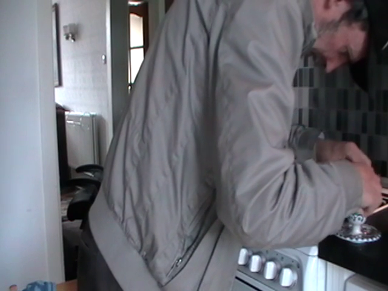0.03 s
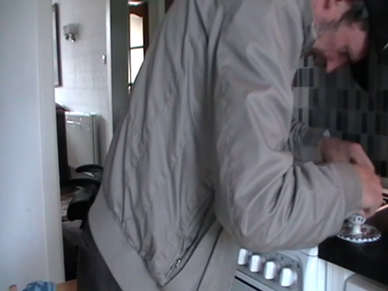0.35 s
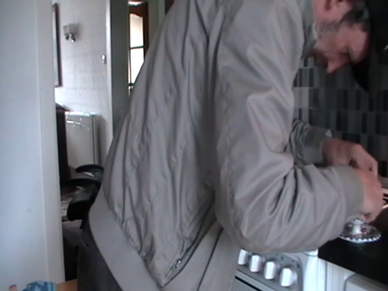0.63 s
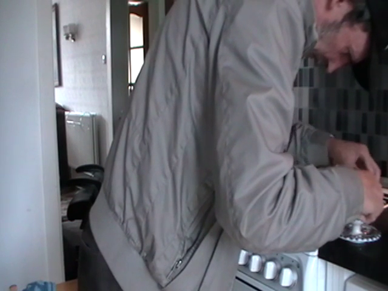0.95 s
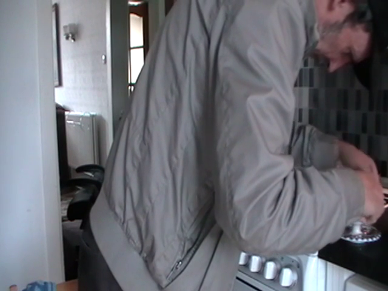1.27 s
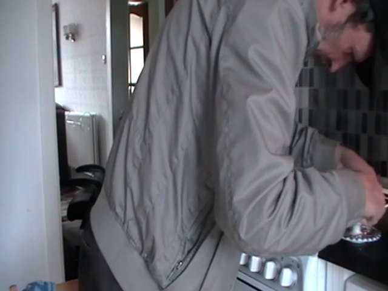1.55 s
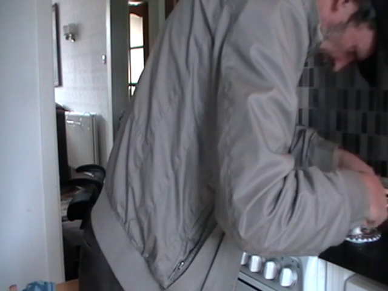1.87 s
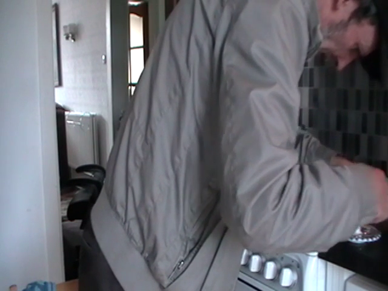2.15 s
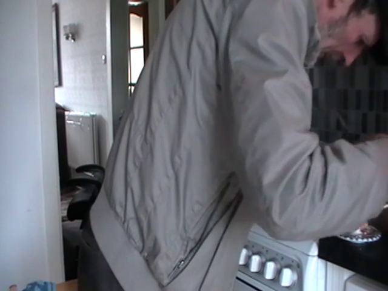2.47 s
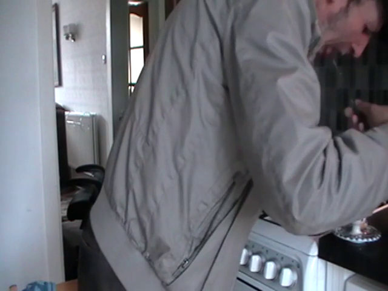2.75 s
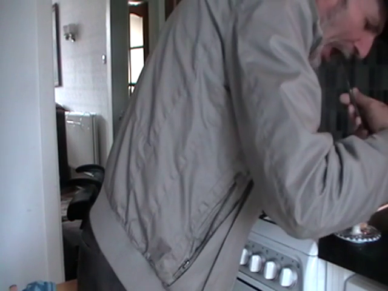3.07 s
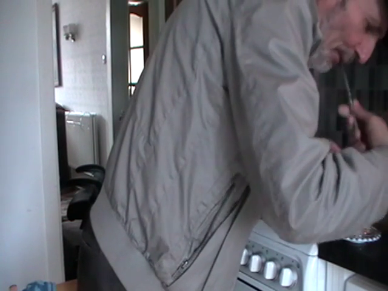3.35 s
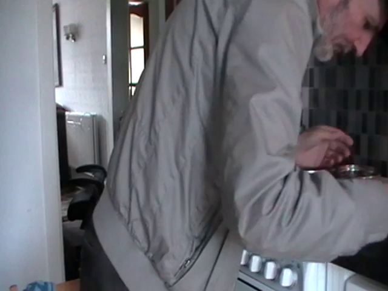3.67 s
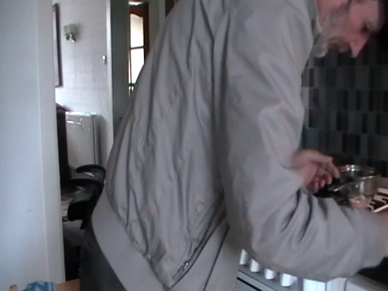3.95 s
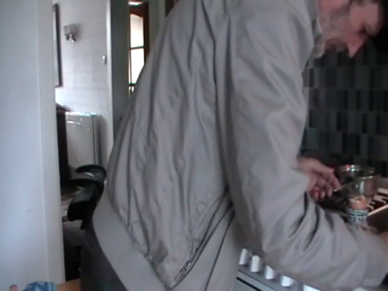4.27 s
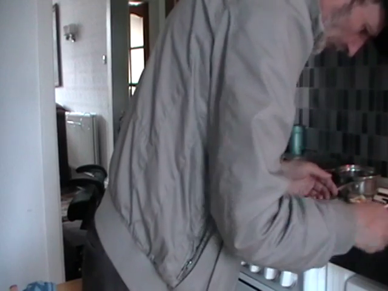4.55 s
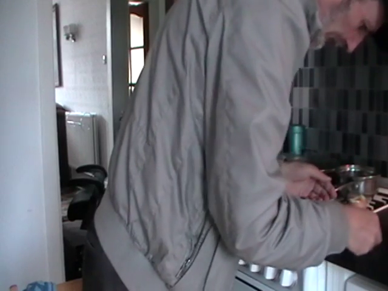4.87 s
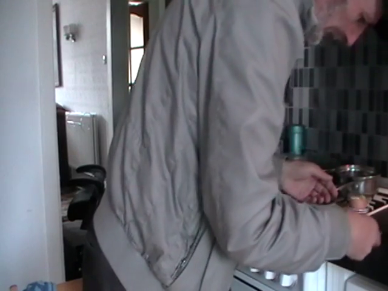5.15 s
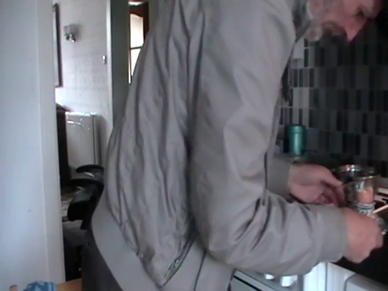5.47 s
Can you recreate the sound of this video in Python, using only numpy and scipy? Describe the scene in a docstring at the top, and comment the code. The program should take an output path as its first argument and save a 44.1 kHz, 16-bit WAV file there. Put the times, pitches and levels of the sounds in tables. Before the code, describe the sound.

Faint eggshell crunching and a rocking metal egg cup, with a sharp clink, one loud worktop knock and soft jacket rustling.

```python
"""Small tiled kitchen, stereo microphone a few steps from the cooker, over room tone and a rustling jacket.
A steel egg cup rocks on the sheet-steel cooker top; from 0.5 s a knife cracks and saws through the shell
of the boiled egg in it. At 2.2 s the blade clinks against the cup. At 4.3 s something is put down hard
on the worktop, shaking the board and the cupboard below. From 4.8 s the cup is moved: it rocks again,
rings and wobbles to rest. The tiled walls answer each contact."""
import sys
import numpy as np
from scipy import signal
from scipy.fft import rfft, irfft, next_fast_len
from scipy.io import wavfile
from scipy.ndimage import map_coordinates

SR = 44100
rng = np.random.default_rng(int(sys.argv[2]) if len(sys.argv) > 2 else 0)


def bounce(signal):
    """Save signal as a 16-bit WAV file at the path given by the first command-line argument."""
    frames = np.transpose(np.atleast_2d(signal))
    limited = np.clip(frames, -1, 1)
    pcm = np.round(limited * 32767).astype(np.int16)
    wavfile.write(sys.argv[1], SR, pcm)


N = 247842
T = np.arange(int(.7 * SR)) / SR  # time within one contact, s

# Room tone with microphone hiss, and rubbing cloth: f/Hz, relative density/dB
ROOM_TONE = [(25, 2), (60, -3.5), (110, -2.5), (160, -6.5), (225, -2), (290, -10), (500, -9), (595, -8),
             (700, -12), (975, -13.5), (1500, -34), (9000, -37.5), (12300, -30), (13200, -72)]
CLOTH_SPECTRUM = [(80, -8), (160, 3), (450, -7.5), (900, 3), (1800, 0), (3000, -2), (7000, -5.5),
                  (9500, -9), (12300, -16.5), (13200, -46)]
# Stereo width of steady noise and of the reverberation: f/Hz, side minus mid/dB
NOISE_WIDTH = [(40, 6.5), (120, 4), (400, 7.5), (1200, 2.5), (4000, -2), (8000, -8.5), (13000, -1)]
REVERB_WIDTH = [(100, -22), (300, -18), (1000, -7.5), (4000, -10), (8000, -12), (12000, 2)]
# Decay of the tiled room: f/Hz, t60/s
REVERB_DECAY = [(100, 0.42), (300, 0.34), (700, 0.49), (1800, 0.49), (5000, 0.45), (12000, 0.32)]
# Course of the jacket rustle: t/s, relative level/dB
RUSTLE_LEVELS = [(0.0, -72.5), (0.46, -71), (0.65, -73), (1.25, -71.5), (1.87, -75), (2.25, -71),
                 (2.38, -70), (3.37, -71), (3.86, -65), (4.28, -66.5), (4.72, -70), (4.938, -67.5),
                 (5.348, -70), (5.62, -62.5)]
# Bumps and landings on the worktop: t/s, level/dB, hardness corner/Hz, boom share/dB
WORKTOP_BLOWS = [(3.992, -55, 1270, 5.5), (4.21, -50, 405, 1), (4.3311, -15, 14000, -27.5),
                 (4.649, -62.5, 295, 10.5)]
# The board's dense clatter, and the crack of steel on steel: f/Hz, relative density/dB
CLATTER_SPECTRUM = [(60, -41), (110, 1.5), (340, -25), (420, 5.5), (560, -2.5), (750, -4), (1000, 4.5),
                    (1500, 3), (2200, 1), (3000, -0.5), (3900, -12), (5400, -14), (8000, -25.5),
                    (13000, -38)]
CRACK_SPECTRUM = [(300, -27), (1950, -17), (2600, -2.5), (3300, -6), (4900, -14), (6500, -9.5), (9000, -23),
                  (13000, -45)]
# Modes of board, hollow below it, knife on cup, and cup: f/Hz, relative level/dB, t60 before damping/s
WORKTOP_MODES = [(255, -13, .4), (331, -14, .3), (405, 2, .28), (441, -1, .25), (516, -1, .25),
                 (542, 0, .25), (769, -6, .35), (941, -4, .25), (973, -3, .25), (1008, -4, .25),
                 (1086, -2, .25), (1123, -3, .25), (1166, -3, .25), (1230, -1, .25), (1269, 0, .28),
                 (1308, -3, .25), (1454, -2, .25), (1500, 0, .28), (1566, -1, .28), (1602, 0, .28),
                 (1703, 0, .28), (1880, -4, .25), (1998, 0, .25), (2028, 1, .25), (2209, -5, .3),
                 (2397, -5, .28), (2578, -4, .28), (2869, -4, .26)]
CUPBOARD_MODES = [(107.1, -0.5, 0.44), (142.6, -2, 0.22), (164, 5, 0.11)]
BLADE_MODES = [(2680, -11, .2), (3133, -7, .18), (3400, -10, .15), (3725, -8, .24), (4027, -9, .26),
               (4410, -9, .25), (4463, -9, .28), (4806, -8, .28), (5050, -11, .2), (6261, -15, .25),
               (7350, -2, .3), (7452, 0, .06), (9335, -10, .36), (10170, -25, .25), (12020, -21, .3),
               (12980, -24, .2)]
CUP_MODES = [(2229, -5, .15), (2666, -1, .24), (2725, -6, .2), (2790, -6, .22), (3020, -4, .16),
             (3350, -10, .12), (3797, -5, .16), (3966, -11, .12), (4183, -8, .16), (4495, -14, .2),
             (5886, -7, .12), (6046, -2, .16), (6133, -2, .22), (6221, -2, .16), (6458, -8, .2),
             (7031, -7, .14), (7332, 2, .11), (8845, -8, .17), (9130, -5, .18), (9300, -8, .13),
             (10070, -10, .2), (11900, -14, .16), (12130, -14, .22), (12720, -9, .18), (13050, -12, .14)]
# Contacts that ring the blade and the cup: t/s, level/dB, hardness corner/Hz
BLADE_CONTACTS = [(2.2376, -29, 13400)]
CUP_CONTACTS = [(0.276, -56.5, 2750), (1.288, -62.5, 2680), (2.1515, -65.5, 2600), (4.8922, -30.5, 15200),
                (5.156, -48, 2980), (5.320, -55.5, 2670)]
# Thin high notes left ringing by the cup's soft taps: t/s, level/dB, f/Hz, t60/s
CUP_TINGS = [(5.156, -66.5, 10070, 0.12), (5.248, -73, 10200, 0.16), (5.335, -61.5, 4900, 0.33)]
# Snaps of shell and ticks of cutlery: t/s, level/dB, centre f/Hz, narrowness Q, t60/s
SNAPS = [(0.552, -59.5, 3660, 2.3, 0.1), (0.6854, -60.5, 4500, 9.4, 0.11), (0.9032, -57, 3640, 1.3, 0.032),
         (1.117, -57, 1850, 1.3, .011), (1.7238, -67.5, 2200, 0.91, 0.0043),
         (2.2343, -44, 4170, 1.9, 0.011), (2.5003, -53.5, 4300, 8.2, 0.018), (2.74, -65.5, 2420, 7.4, .02),
         (2.9366, -58.5, 2620, 4.8, 0.025), (2.936, -59.5, 8000, 14, 0.015),
         (3.931, -58.5, 2560, 8.8, 0.0038), (3.993, -58.5, 3460, 2.1, 0.064),
         (5.443, -51.5, 2500, 3.5, 0.099)]
# Knife strokes through the shell: start t/s, length/s, crumb level/dB, centre f/Hz
KNIFE_STROKES = [(0.501, .11, -62, 4000), (0.654, .045, -65, 4830), (0.899, .04, -62.5, 4500),
                 (1.089, .04, -62, 5100), (1.444, .06, -68.5, 5150)]
# Modes of the sheet-steel cooker top: f/Hz, width/Hz, relative level/dB
COOKER_MODES = [(167, 31, -8.5), (259, 44, -7.5), (332, 65, 0.5), (411.5, 12, -8.5), (439, 17.6, -1),
                (547, 53, -3.5), (594, 49, -7), (691, 53, -4.5), (990, 130, -14.5)]
# The pushed cup lands on the cooker: t/s, relative level/dB, time tipped/s, weight/dB (more gives more bass)
CUP_LANDINGS = [(0.026, -50, 0.0001, -6.5), (0.124, -44, .024, -30), (0.185, -49.5, 0.00045, -21),
                (0.297, -35.5, .02, -11), (0.597, -43, .03, -47), (0.756, -52, 0.001, 12),
                (0.893, -50.5, 0.0011, -41), (1.242, -44.5, 0, -15), (1.29, -38, 0, -19),
                (1.477, -46, 0.00066, -10), (1.503, -45.5, 0, -14), (1.594, -43, 0, -20),
                (1.669, -54, 0.0037, -28), (2.237, -32, 0, -16.5), (2.609, -49, 0.042, -7),
                (4.822, -46.5, 0.0062, -13), (4.92, -37.5, .02, -7), (4.978, -37, 0, -16),
                (5.039, -42, 0, -21), (5.12, -37, .022, 7)]

TOP_HZ = 13450  # upper band limit at the microphone


def amp(db):
    """Decibels to gain."""
    return 10 ** (np.asarray(db) / 20)


def unit(x):
    """Scale to rms 1."""
    return x / np.sqrt(np.mean(x ** 2) + 1e-20)


def unit_hit(x):
    """Scale a hit to rms 1 over its first 20 ms."""
    return x / np.sqrt(np.mean(x[..., :SR // 50] ** 2) + 1e-20)


def along(points, hz):
    """Interpolate (f/Hz, value) points on a log frequency axis."""
    f, v = np.transpose(points)
    return np.interp(np.log(hz + 1), np.log(f + 1), v)


def filtered(x, response):
    """Shape x by a gain that depends on frequency."""
    n = x.shape[-1]
    m = next_fast_len(n + 8192)
    return irfft(rfft(x, m) * response(np.fft.rfftfreq(m, 1 / SR)), m)[..., :n]


def add(out, s, x):
    """Mix x into out at time s."""
    part = out[:, round(s * SR):][:, :x.shape[-1]]
    part += x[..., :part.shape[1]]


def uneven(start_s, end_s, gap_s, scatter):
    """Times about one gap apart, each shifted by chance."""
    s = np.arange(start_s, end_s, gap_s)
    return np.abs(s + scatter * gap_s * rng.uniform(-1, 1, 64)[:len(s)])


def burst(response, t60):
    """Coloured noise that starts at once and dies away."""
    return unit_hit(filtered(rng.standard_normal(len(T)), response) * amp(-60 * T / t60))


def softened(hz, corner_hz):
    """Low-pass gain: a soft contact cannot shake the high modes."""
    return 1 / np.sqrt(1 + (hz / corner_hz) ** 6)


def resonances(hz, width, size):
    """The response of a set of peaks, as a function of frequency."""
    return lambda f: np.sum(size / (1 + ((f - hz) / width) ** 2), axis=0)


def ring(modes, corner_hz, damping):
    """Decaying modes, struck at slightly new strengths each time; damping divides their t60."""
    hz, db, t60 = np.transpose(modes)[:, :, None]
    size = amp(db + rng.standard_normal(hz.shape) - 60 * damping * T / t60) * softened(hz, corner_hz)
    return np.sum(size * np.sin(2 * np.pi * (hz * T + rng.random(hz.shape))), axis=0)


def stereo_noise(n, width):
    """Left and right noise from a mid and a side signal."""
    mid, side = rng.standard_normal((2, n))
    side = filtered(side, lambda hz: amp(along(width, hz)))
    return np.array([mid + side, mid - side])


def hiss(spectrum):
    """Steady coloured stereo noise of rms 1."""
    return unit(filtered(stereo_noise(N, NOISE_WIDTH), lambda hz: amp(along(spectrum, hz))))


def room_tone():
    """The quiet of the kitchen and the microphone's own hiss."""
    return amp(-59) * hiss(ROOM_TONE)


def at_mic(x, wet_db):
    """A hit from a few steps away: direct sound plus the tiled walls' dense answer, at unit level."""
    hz, t, spectra = signal.stft(stereo_noise(len(T), REVERB_WIDTH), SR, nperseg=256)
    decay = amp(-60 * t / along(REVERB_DECAY, hz)[:, None])
    tail = signal.istft(spectra * decay, SR, nperseg=256)[1]
    reverb = signal.fftconvolve(x[None], tail / np.linalg.norm(tail[0]), axes=1)[:, :len(x)]
    return unit_hit(x + amp(wet_db) * reverb)


def jacket():
    """The sleeve brushes the body of the jacket, catching and slipping."""
    s, db = np.transpose(RUSTLE_LEVELS)
    t = np.arange(N) / SR
    slips_per_s = 90
    slip_db = map_coordinates(rng.standard_normal(int(t[-1] * slips_per_s) + 4), [t * slips_per_s])
    return amp(np.interp(t, s, db) + 10.5) * unit(hiss(CLOTH_SPECTRUM) * amp(slip_db))


def worktop():
    """A blow shakes the board and the cupboard under it: dense clatter, strong modes and a low boom."""
    out = np.zeros((2, N))
    swell = 1 - np.exp(-T / 0.017)  # the heavy wood takes a moment to move
    for s, level_db, corner_hz, boom_db in WORKTOP_BLOWS:
        rattle = burst(lambda f: amp(along(CLATTER_SPECTRUM, f)) * softened(f, corner_hz), t60=0.027)
        clatter = amp(-1) * at_mic(rattle * (1 - np.exp(-T / 0.0012)), wet_db=6)
        board = amp(-1) * at_mic(ring(WORKTOP_MODES, corner_hz, damping=1.15), wet_db=-12)
        boom = amp(boom_db) * at_mic(ring(CUPBOARD_MODES, corner_hz, damping=0.75), wet_db=-15)
        add(out, s, amp(level_db) * (clatter + swell * (board + boom)))
    # the cupboard gives off little below its lowest mode
    return signal.sosfilt(signal.butter(4, 95, "highpass", fs=SR, output="sos"), out)


def cup_tings():
    """Each soft tap of the cup leaves one thin, lingering high note ringing."""
    out = np.zeros((2, N))
    for s, level_db, hz, t60 in CUP_TINGS:
        add(out, s, amp(level_db) * at_mic(ring([(hz, 0, t60)], TOP_HZ, damping=1), wet_db=-16))
    return out


def rim_wobble():
    """Quick, ever softer taps of the rim keep a few low modes of the cup ringing as it settles."""
    out = np.zeros((2, N))
    start_s, end_s, fade_db_per_s = 5.16, 5.33, 40
    rim_modes = [mode for mode in CUP_MODES if 2600 < mode[0] < 2850]
    for s in uneven(start_s, end_s, gap_s=0.033, scatter=.2):
        level_db = -54 - fade_db_per_s * (s - start_s)
        add(out, s, amp(level_db) * at_mic(ring(rim_modes, TOP_HZ, damping=2.3), wet_db=2))
    return out


def steel_clinks(taps, modes, damping, buzz_db, buzz_width_hz, crack_db, crack_t60, wet_db):
    """Each contact cracks, buzzes while the parts still touch, and leaves the steel ringing."""
    out = np.zeros((2, N))
    hz, db, _ = np.transpose(modes)[:, :, None]
    peaks = resonances(hz, buzz_width_hz, amp(db))
    radiation = lambda f: 1 - softened(f, 2250)  # small parts give off little below their lowest mode
    for s, level_db, corner_hz in taps:
        crack = burst(lambda f: amp(along(CRACK_SPECTRUM, f)) * softened(f, corner_hz), crack_t60)
        buzz = burst(lambda f: peaks(f) * radiation(f) * softened(f, corner_hz), t60=0.053)
        tone = at_mic(ring(modes, corner_hz, damping), wet_db)
        contact = amp(crack_db) * at_mic(crack, wet_db=32) + amp(buzz_db) * at_mic(buzz, wet_db=-0.5)
        harshness = softened(2130, corner_hz)  # a gentle touch leaves almost pure ringing
        add(out, s, amp(level_db) * unit_hit(tone + harshness * contact))
    return out


def snap(centre_hz, q, edge_db, t60):
    """A brittle snap or short crunch, with one resonance and a crisp treble edge."""
    body = burst(lambda f: 1 / np.hypot(1, q * np.log((f + 1) / centre_hz)) ** 2, t60)
    edge = burst(lambda f: np.exp(-((f - 8700) / 2700) ** 2), t60)
    swell = 1 - np.exp(-T / (0.015 * t60))  # the longer a crunch, the softer it starts
    return at_mic(swell * (body + amp(edge_db) * edge), wet_db=2.5)


def shell_and_cutlery():
    """Single snaps of the shell and ticks of the cutlery."""
    out = np.zeros((2, N))
    for s, level_db, centre_hz, q, t60 in SNAPS:
        add(out, s, amp(level_db) * snap(centre_hz, q, edge_db=-22, t60=t60))
    return out


def knife_sawing():
    """Each stroke of the knife breaks a run of shell crumbs of chance size and pitch."""
    out = np.zeros((2, N))
    spread_octaves = 0.34
    for start_s, length_s, level_db, centre_hz in KNIFE_STROKES:
        for s in uneven(start_s, start_s + length_s, gap_s=.016, scatter=0.63):
            size_db, pitch = rng.standard_normal(2)
            crumb = snap(centre_hz * 2 ** (spread_octaves * pitch), q=3.5, edge_db=-7, t60=0.035)
            add(out, s, amp(level_db + size_db) * crumb)
    return out


def foot_contacts():
    """The cup's foot tips, lands, rebounds and jiggles: t/s, relative level/dB, weight/dB."""
    for s, level_db, tipped_s, weight_db in CUP_LANDINGS:
        if tipped_s > 0:
            yield s - tipped_s, level_db - 7, weight_db
        yield s, level_db, weight_db
        if level_db > -41:  # only hard landings bounce
            yield s + 0.021, level_db - 9.5, weight_db
    for s in uneven(0.35, 1.25, gap_s=.1, scatter=.2):  # the held cup jiggles while the knife works
        yield s, -56, -10


def cup_rocking():
    """The foot of the cup chatters on the cooker top, whose sheet answers with a hollow knock."""
    out = np.zeros((2, N))
    hz, width, db = np.transpose(COOKER_MODES)[:, :, None]
    attack = 1 - np.exp(-T / 0.0039)
    decay = np.exp(-np.pi * width * T)
    for s, level_db, weight_db in foot_contacts():
        bass_db = 0.28 * (weight_db + 16) * (hz < 350)  # a heavier push brings out the low modes
        bright_db = 0.31 * (level_db + 47) * (hz > 570)  # a harder landing is brighter
        size = amp(db + bass_db + bright_db)
        knock = np.sum(size * decay * np.sin(2 * np.pi * (hz * T + rng.random(hz.shape))), axis=0)
        chatter = burst(resonances(hz, width, size), t60=.17)
        sheet = attack * (unit_hit(knock) + amp(-6) * chatter)
        add(out, s, amp(level_db - 8.5) * at_mic(sheet, wet_db=-2))
    return out


def scene():
    """Cup, knife and egg, worktop and jacket over the room tone, as they reach the microphone."""
    blade = steel_clinks(BLADE_CONTACTS, BLADE_MODES, damping=1.7, buzz_db=4, buzz_width_hz=130,
                         crack_db=-3, crack_t60=0.0038, wet_db=-7)
    cup = steel_clinks(CUP_CONTACTS, CUP_MODES, damping=2.2, buzz_db=-3.5, buzz_width_hz=50,
                       crack_db=-7, crack_t60=0.044, wet_db=2.5)
    cutting = cup_rocking() + knife_sawing() + shell_and_cutlery()
    ringing = blade + cup + rim_wobble() + cup_tings()
    return cutting + ringing + worktop() + jacket() + room_tone()


def record(dry):
    """The microphone chain: an 80 Hz low cut and a steep upper band limit."""
    thin = signal.sosfilt(signal.butter(2, 80, "highpass", fs=SR, output="sos"), dry)
    return filtered(thin, lambda hz: np.clip((TOP_HZ - hz) / 300 + .5, 0, 1))


dry = scene()
out = record(dry)
bounce(out)
```